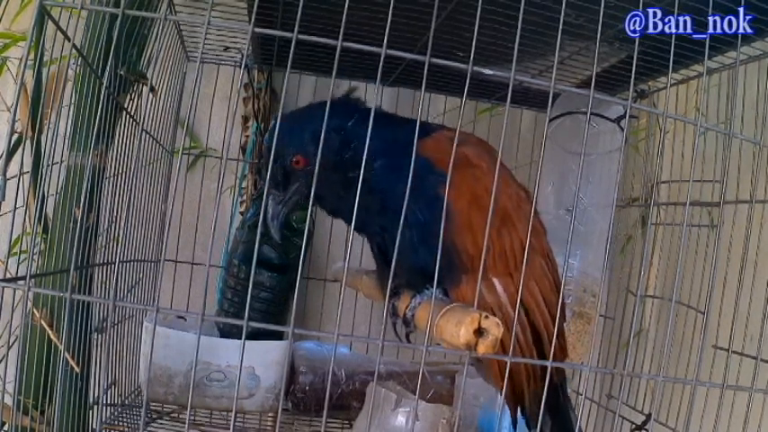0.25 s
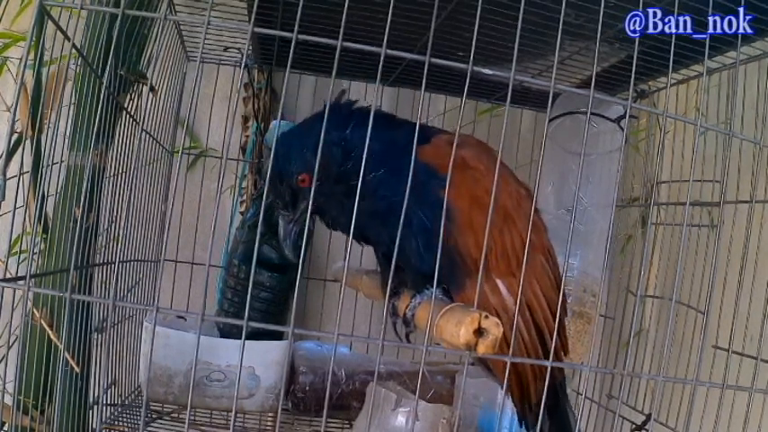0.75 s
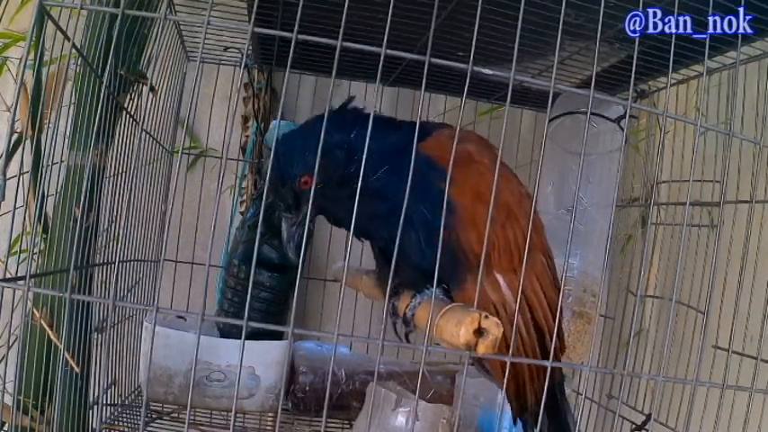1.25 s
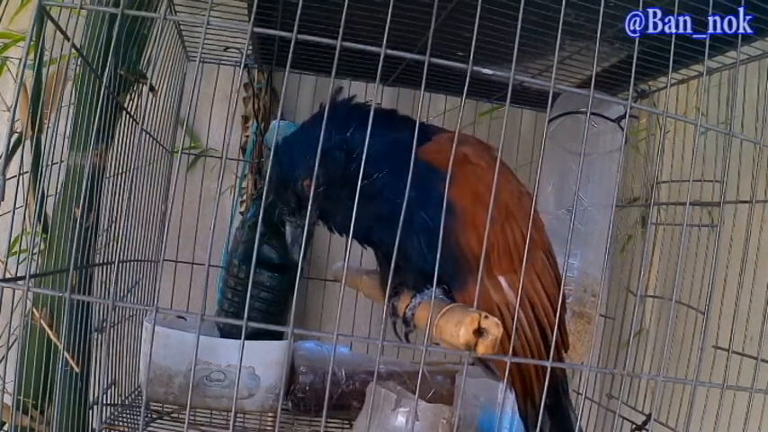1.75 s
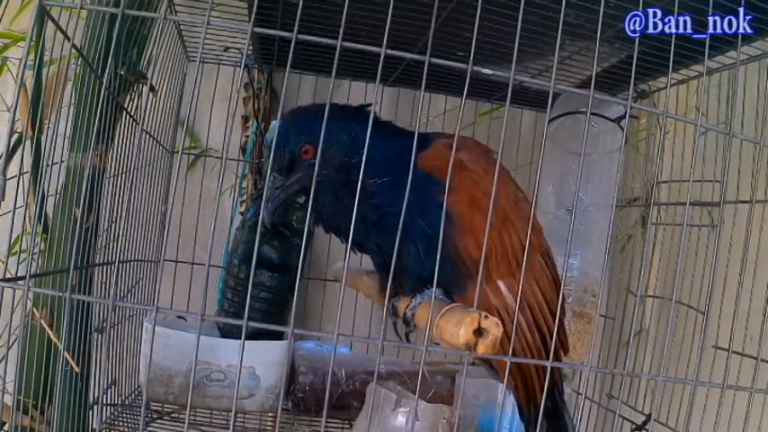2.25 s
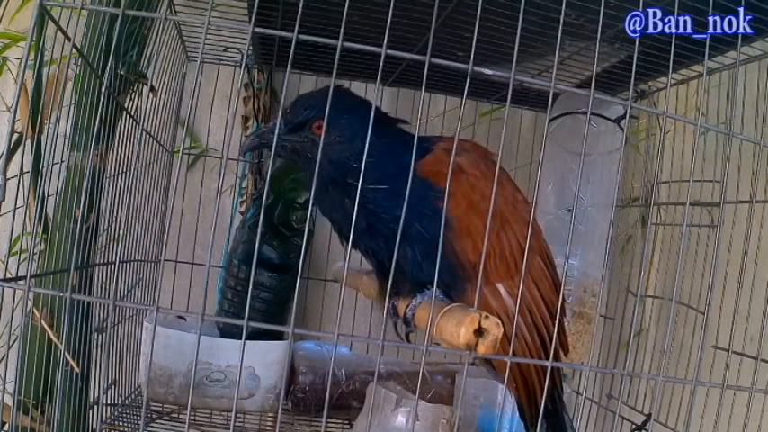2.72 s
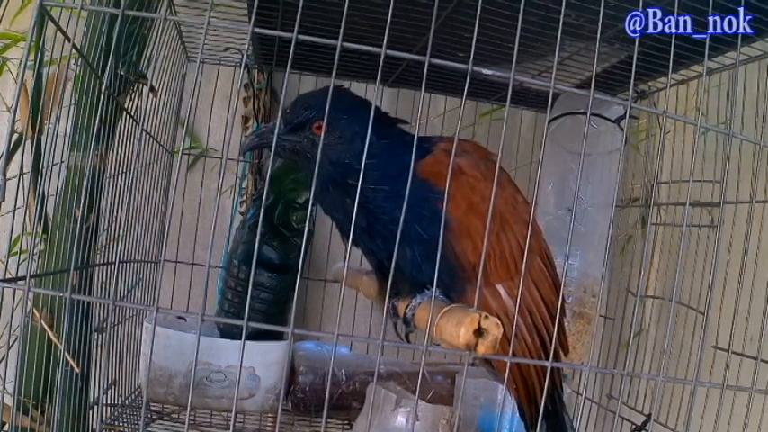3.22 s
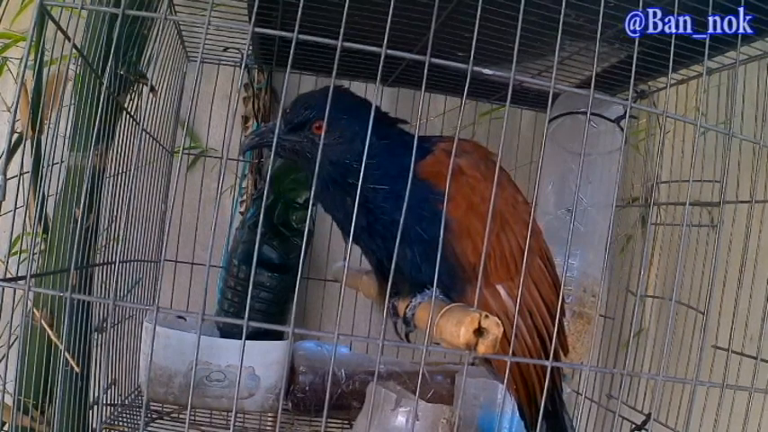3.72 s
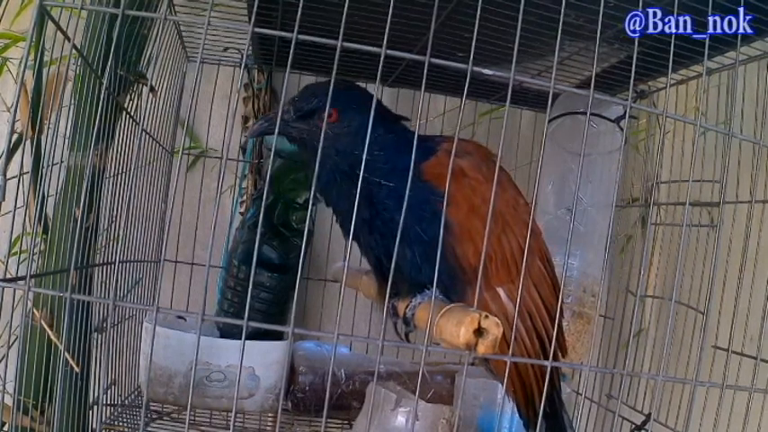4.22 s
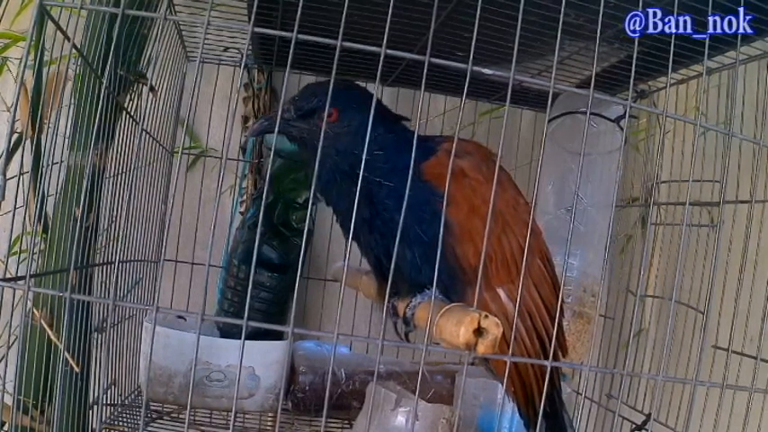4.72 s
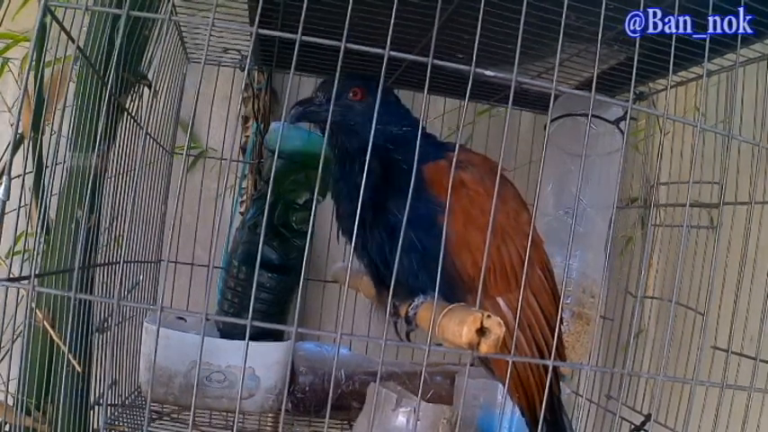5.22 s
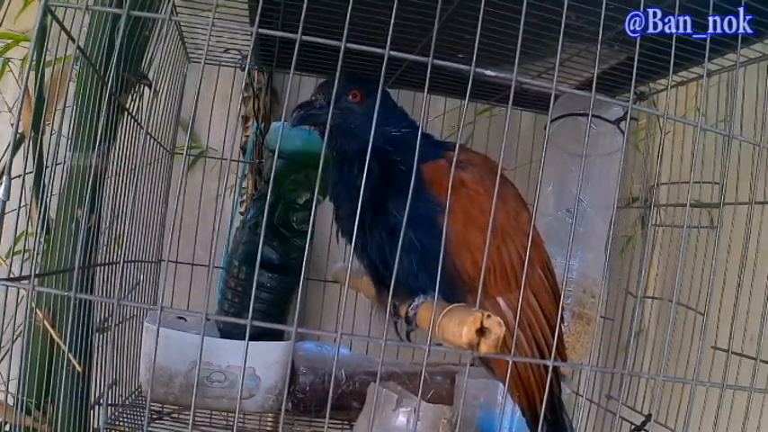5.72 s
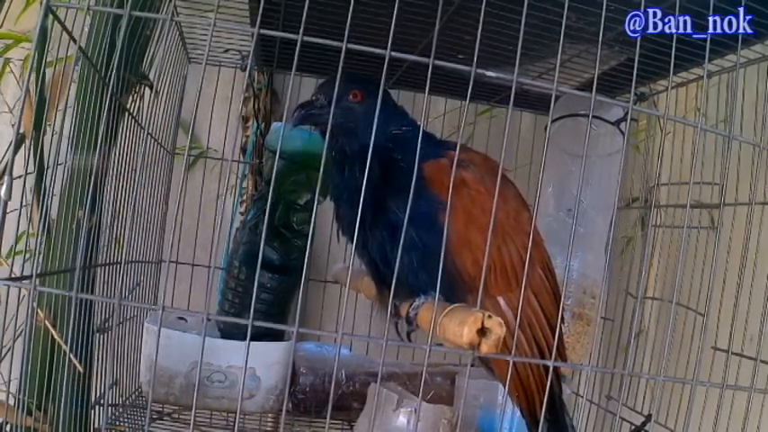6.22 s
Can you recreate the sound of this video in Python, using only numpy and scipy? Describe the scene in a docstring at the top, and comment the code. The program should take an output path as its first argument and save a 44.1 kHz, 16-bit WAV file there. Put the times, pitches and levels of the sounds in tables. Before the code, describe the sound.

A caged coucal close by gives six deep, pure, evenly spaced hoots, then quiet yard ambience with faint distant chirps and a whistle.

```python
"""A yard: a caged coucal hoots six times with a closed beak, close to the camera, as pure throat tones.
Two distant birds follow in gliding near-sine notes smeared by echoes: one chirps a phrase twice, one whistles.
Shaped noise makes the far traffic's rumble, the microphone's hiss and two brief bright rustles.
A far engine drones late on, and the camera's focus drive ticks faintly in short high rings."""
import sys
import numpy as np
from scipy import signal
from scipy.io import wavfile
from scipy.ndimage import uniform_filter1d

SR = 44100
rng = np.random.default_rng(int(sys.argv[2]) if len(sys.argv) > 2 else 0)


def unload_wav(signal):
    """Save mono or channel-first audio to the path in sys.argv[1] as 16-bit WAV at rate SR, clipped to [-1, 1]."""
    wavfile.write(
        sys.argv[1],
        SR,
        np.round(np.clip(np.atleast_2d(signal).T, -1, 1) * 32767).astype(np.int16),
    )


N = 284886  # samples, about 6.46 s


def gain_of(db):
    """Decibels to amplitude gain."""
    return 10 ** (np.asarray(db) / 20)


def evened(x):
    """Scales a signal to rms 1."""
    return x / np.sqrt(np.mean(x ** 2) + 1e-20)


def coloured(points, length, patchy_db):
    """Noise of rms 1 with a given spectrum, its level drifting in patches of time and pitch."""
    frames = length // 256 + 5
    bin_hz = np.fft.rfftfreq(1024, 1 / SR)
    real, imaginary, patches = rng.standard_normal((frames, 513, 3)).T
    patches = uniform_filter1d(patches, size=8, axis=0)
    patches = evened(uniform_filter1d(patches, size=12, axis=1))
    point_hz, point_db = np.transpose(points)
    shape_db = np.interp(np.log(bin_hz + 1), np.log(point_hz + 1), point_db)[:, None]
    spectrum = (real + 1j * imaginary) * gain_of(shape_db + patchy_db * patches)
    noise = signal.istft(spectrum, nperseg=1024, noverlap=768)[1]
    return evened(noise[:length])


def add(mix, start_s, sound):
    """Mixes a sound in at its start time, cut off at the end of the scene."""
    part = mix[round(start_s * SR):][:len(sound)]
    part += sound[:len(part)]


def note(level, hz, waver, flutter_db=0):
    """Level and phase of a gliding note; waver (share of the pitch) and flutter are rms trembles."""
    shakes = rng.standard_normal((2, len(hz)))
    pitch_shake, level_shake = (evened(uniform_filter1d(shake, size=100)) for shake in shakes)
    smooth_hz = uniform_filter1d(hz, size=300, mode="nearest")  # rounds the corners of the glide
    pitch = smooth_hz * (1 + waver * pitch_shake)
    phase = 2 * np.pi * np.cumsum(pitch) / SR
    return level * gain_of(flutter_db * level_shake), phase


def echoes(x, first_s, build_s, t60):
    """Walls and trees: sparse taps of random sign that build up and die away, with total energy 1."""
    at = np.arange(0, SR, 20) + rng.integers(0, 20, SR // 20)  # one tap at random in every 20 samples
    t = np.maximum(at / SR - first_s, 0)
    signs = rng.choice([-1., 1.], len(at))
    taps = np.zeros(SR + 20)
    taps[at] = signs * np.minimum(t / build_s, 1) * gain_of(-60 * t / t60)
    return signal.fftconvolve(x, taps / np.linalg.norm(taps))[:N]


def drone():
    """A far engine: one low tone with a wavering pitch and level."""
    # Each row: time in seconds, level in dB, pitch in Hz before the waver.
    hum = [(4.0, -65.5, 115.1), (4.3, -60, 115), (5.4, -55.5, 110.7), (6.46, -58.5, 112.8)]
    s, db, hz = np.transpose(hum)
    t = np.arange(N) / SR
    level = np.interp(t, s, gain_of(db), left=0)  # silent until the first row
    level, phase = note(level, np.interp(t, s, hz), waver=.1, flutter_db=1.5)
    return level * np.sqrt(2) * np.sin(phase)


def yard():
    """Far traffic and hiss as one shaped noise whose bass swells with passing traffic, plus drone and rustles."""
    # Spectrum of rumble and hiss. Each row: frequency in Hz, relative level in dB per Hz.
    yard_spectrum = [(20, -2.5), (45, -1.5), (105, -2.5), (140, -9), (300, -14), (450, -16.5),
                     (1000, -22.5), (2000, -30), (4000, -33.5), (8400, -38), (10800, -38), (13000, -38),
                     (15000, -38.5), (16000, -39)]
    # Traffic swelling the bass. Each row: time in seconds, gain in dB.
    traffic_swell = [(0, -6), (2, 0), (3.996, -0.5), (4.6, -1), (5.6, 0), (6.46, 3)]
    # Brief bright rustles. Each row: start in seconds, rms level in dB before the fades, length in seconds.
    rustles = [(4.762, -62, 0.0305), (5.161, -61.5, 0.0304)]
    # Spectrum of a rustle. Each row: frequency in Hz, relative level in dB per Hz.
    rustle_spectrum = [(3000, -20), (5500, -0.5), (9000, -2), (11500, 1.5), (14000, -10)]
    wash = gain_of(-47) * coloured(yard_spectrum, N, patchy_db=0.82)  # rms before the swell
    bass = signal.sosfilt(signal.butter(2, 140, fs=SR, output="sos"), wash)
    swell = gain_of(np.interp(np.arange(N) / SR, *np.transpose(traffic_swell)))
    out = wash + (swell - 1) * bass + drone()
    for start_s, db, length_s in rustles:
        puff = coloured(rustle_spectrum, 4096, patchy_db=0.5)[:round(length_s * SR)]
        add(out, start_s, gain_of(db) * puff * np.hanning(len(puff)))
    return out


def focus_drive():
    """Evenly spaced steps of the focus drive; each rings one short, blurred high mode of the camera body."""
    # Each row: first tick in seconds, time in seconds before which the run ends.
    tick_runs = [(.0315, 4.78), (4.7918, 6.46)]
    gap_s, mode_hz, width_hz = .066692, 10830, 480  # a wider mode dies faster
    level_db, spread_db, detune = -46, 1.9, 0.014  # gain on the ring, its spread, spread as a share of pitch
    at = np.concatenate([np.arange(first, until, gap_s) for first, until in tick_runs])
    t = np.arange(300) / SR
    envelope = np.sqrt(t / .001) * np.exp(-np.pi * width_hz * t)
    out = np.zeros(N)
    for start_s, (size, tune) in zip(at, rng.standard_normal((len(at), 2))):
        ring = envelope * np.sin(2 * np.pi * mode_hz * (1 + detune * tune) * t)
        add(out, start_s, gain_of(level_db + spread_db * size) * ring)
    return out


def song(notes, start_s, db, edge_s, waver, flutter_db):
    """Near-sine notes of a small bird; each glides to a turn, then drifts from it."""
    out = np.zeros(N)
    for note_s, length_s, glide_s, *row in notes:
        levels_db, pitches_hz, buzz = np.array(row[0:3]), row[3:6], sum(row[6:])  # no buzz column: 0
        t = np.arange(0, length_s, 1 / SR)
        turns = [0, glide_s, length_s]
        fades = np.minimum(np.minimum(t, length_s - t) / edge_s, 1)
        level = np.interp(t, turns, gain_of(db + levels_db)) * fades
        level, phase = note(level, np.interp(t, turns, pitches_hz), waver + buzz, flutter_db)
        add(out, start_s + note_s, level * np.sqrt(2) * np.sin(phase))
    return out


def far_birds():
    """Two distant singers: leaves near each scatter the sound at once, far walls add a long tail."""
    # The chirped phrase. Each row: start in seconds into the phrase, length and glide in seconds,
    # relative level in dB at start, turn and end, pitch in Hz at start, turn and end, buzz as a share of pitch.
    chirp_notes = [(0, .046, .022, -55.5, -58.5, -64.5, 2494, 3200, 4390, 0.0543),
                   (.04, .056, 0.0347, -61.5, -63, -58, 4390, 4498, 4746, 0.0239),
                   (.026, .102, 0.04986, -55.5, -58.5, -65, 3554, 3801, 3956, 0.05896),
                   (.097, 0.016, 0.0088, -66, -65.5, -70, 2900, 2650, 2550, 0.018),
                   (.184, 0.02, 0.0031, -41, -49, -51.5, 2607, 2688, 2773, 0.0455),
                   (.224, .05, .028, -52.5, -46.5, -61, 3200, 2950, 3050, 0.0542),
                   (.272, 0.053, 0.01516, -54.5, -59, -53.5, 3362, 3572, 3600, .025),
                   (.33, .046, 0.01984, -73.5, -48, -57.5, 3369, 3050, 2885, .012)]
    # Each row: start of the phrase in seconds, gain on it in dB.
    chirp_phrases = [(2.19, 0.5), (5.108, 0)]
    # Each row: start, length and glide in seconds, level in dB at start, turn and end,
    # pitch in Hz at start, turn and end.
    whistle_notes = [(3.035, 0.1366, 0.0464, -67, -49.5, -37.5, 1341, 1618, 1630),
                     (3.33, .262, .068, -51, -45.5, -44, 2276, 1858, 1958),
                     (3.6, 0.04, 0.02355, -43.5, -43.5, -58, 1805, 1621, 1128),
                     (3.648, .064, 0.0159, -49.5, -49, -60.5, 1121, 1030, 942)]
    chirps = sum(song(chirp_notes, start_s, db, edge_s=0.00236, waver=0, flutter_db=2.5)
                 for start_s, db in chirp_phrases)
    whistles = song(whistle_notes, 0, 0, edge_s=0.0107, waver=.007, flutter_db=2)
    # Leaves
    chirps = chirps + gain_of(-3.0) * echoes(chirps, first_s=0.00115, build_s=0.00174, t60=0.151)
    whistles = whistles + gain_of(-9) * echoes(whistles, first_s=.002, build_s=.002, t60=.3)
    # Far walls
    chirps = chirps + gain_of(-6) * echoes(chirps, first_s=0.019, build_s=0.022, t60=0.944)
    return chirps + whistles + gain_of(-5) * echoes(whistles, first_s=0.007, build_s=0.01, t60=1.192)


def hoot(length_s, early_db, late_db, overshoot_hz, sag_hz, top_hz):
    """Effort ramps up, holds and ramps down; pitch scoops up, sags, climbs, drops as the throat closes."""
    overshoot_s, sag_s, sag_end_s = .019, .058, .088  # after the start
    climb_s, drop_s = .038, .016  # before the end
    scoop, drop = 0.9035, .94  # start as a share of the sag pitch, end as a share of the top pitch
    rise_per_s, release_s = 6.8, .045  # level gained a second at the start; time to close at the end
    toe_in_s, toe_out_s, shoulder = .003, 0.016, 8.0  # soft ends of the ramps; sharpness of their bend
    t = np.arange(1, length_s * SR) / SR
    left = length_s - t + 1 / SR
    hold = np.interp(t, [sag_end_s, length_s - sag_s], gain_of([early_db, late_db]))
    rise = rise_per_s * t ** 2 / (t + toe_in_s)
    fall = gain_of(late_db) / release_s * left ** 2 / (left + toe_out_s)
    # A soft minimum of the three bends the ramps into the hold
    level = (rise ** -shoulder + hold ** -shoulder + fall ** -shoulder) ** (-1 / shoulder)
    hz = np.interp(t, [0, overshoot_s, sag_s, sag_end_s, length_s - climb_s, length_s - drop_s],
                   [scoop * sag_hz, overshoot_hz, sag_hz, sag_hz, top_hz, drop * top_hz])
    return note(level, hz, waver=0.0043, flutter_db=0.0439)


def coucal():
    """A nearly pure tone from the inflated throat, with rushing air that grows faster than the tone."""
    # Each row: start and length in seconds, effort early and late in the hold as rms dB,
    # pitch in Hz at the overshoot, the sag and the top of the climb.
    hoots = [(-.105, 0.2185, -7.5, -9, 329.6, 309.1, 328.1), (.234, 0.207, -7.5, -7.5, 332.9, 309.8, 330.8),
             (.564, 0.21325, -6.5, -7, 325.5, 305.8, 328.3), (.907, 0.21844, -7, -7, 320.9, 302.7, 322.6),
             (1.265, 0.2204, -8, -7.5, 315.8, 298.5, 319.8), (1.649, 0.22, -13, -9.5, 304, 292.9, 313.6)]
    # Each row: multiple of the fundamental, level in dB relative to it.
    overtones = [(2, -42), (3, -55)]
    # Air rushing through the swollen throat. Each row: frequency in Hz, relative level in dB per Hz.
    throat_air = [(25, 2), (100, 2.5), (230, 5), (420, 4), (650, 0.5), (830, -10.5), (1430, -14.5),
                  (1560, -24.5), (2300, -31.5), (4000, -43), (8000, -71)]
    air_db = -27  # relative to the hoot, at its loudest
    out = np.zeros(N)
    air = coloured(throat_air, N, patchy_db=0.1)
    for start_s, *shape in hoots:
        skipped = round(max(-start_s, 0) * SR)  # part of a hoot already under way
        level, phase = (v[skipped:] for v in hoot(*shape))
        phase = phase - phase[0]  # so that it starts without a click
        start_s = max(start_s, 0)
        tone = np.sin(phase) + sum(gain_of(db) * np.sin(k * phase) for k, db in overtones)
        breath = air[round(start_s * SR):][:len(level)]
        rush = gain_of(air_db) * breath * (level / level.max()) ** 0.083
        add(out, start_s, level * (np.sqrt(2) * tone + rush))
    return out + gain_of(-40) * echoes(out, first_s=.04, build_s=.07, t60=1.9)


def scene():
    """All sources, far and near, at one microphone."""
    return (yard() + focus_drive() + far_birds() + coucal())[None]


def record(dry):
    """The converter adds a steady bias, then a steep low-pass limits the band."""
    bias, edge_hz = .005, 15700
    low_pass = signal.firwin(2047, edge_hz, window=("kaiser", 9), fs=SR)
    return signal.oaconvolve(dry + bias, low_pass[None], "same")


dry = scene()
out = record(dry)
unload_wav(out)
```